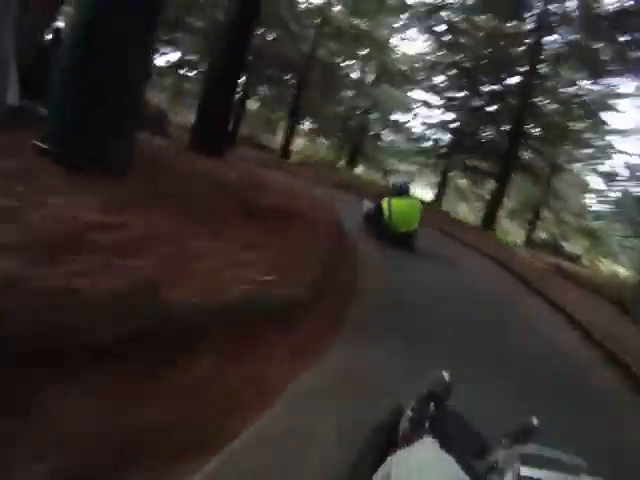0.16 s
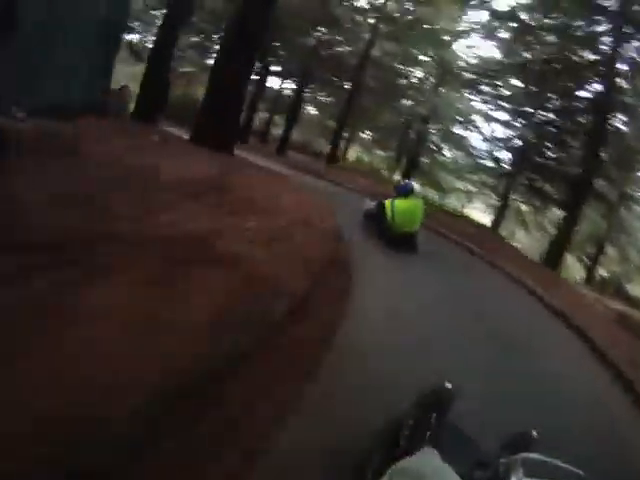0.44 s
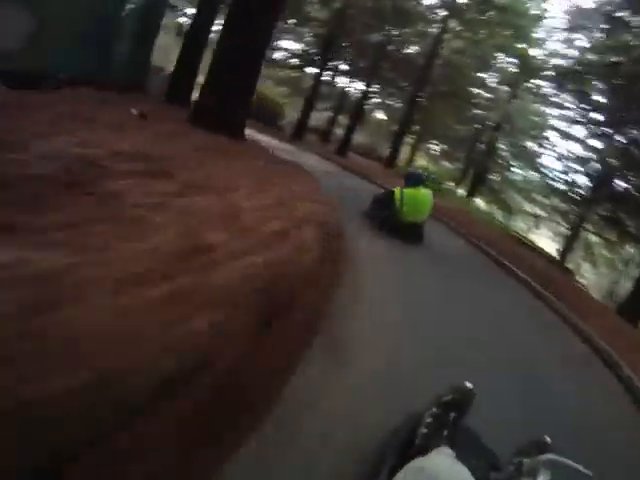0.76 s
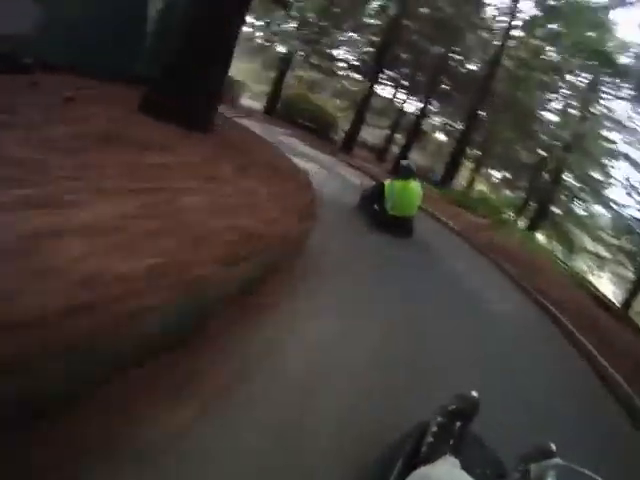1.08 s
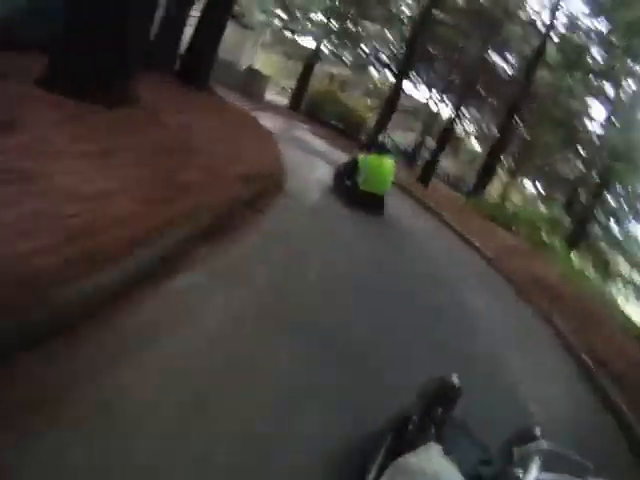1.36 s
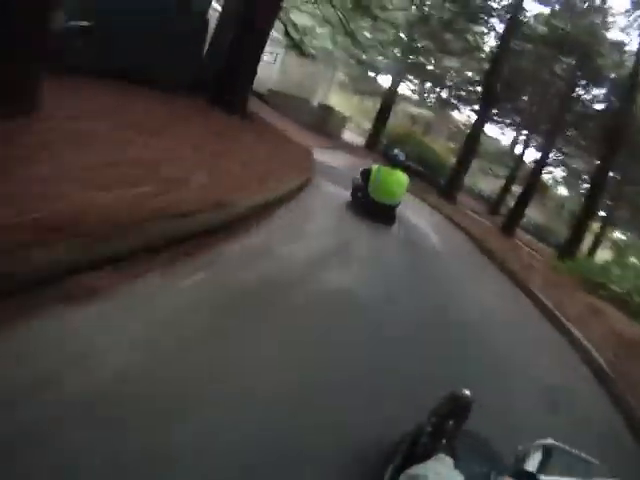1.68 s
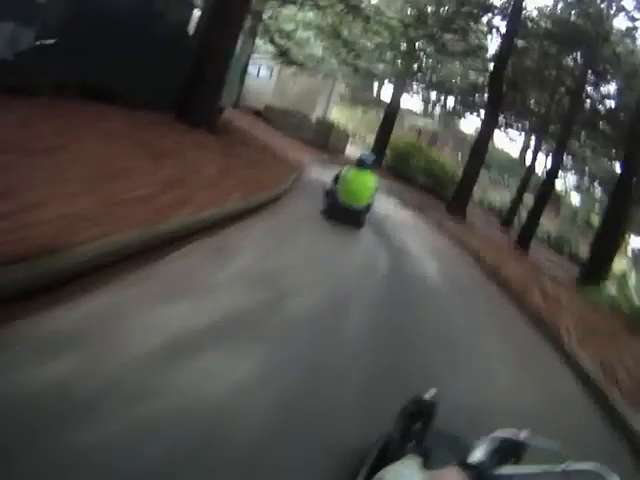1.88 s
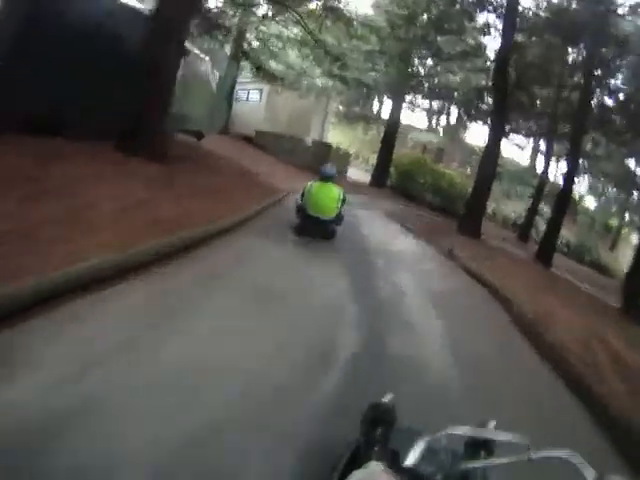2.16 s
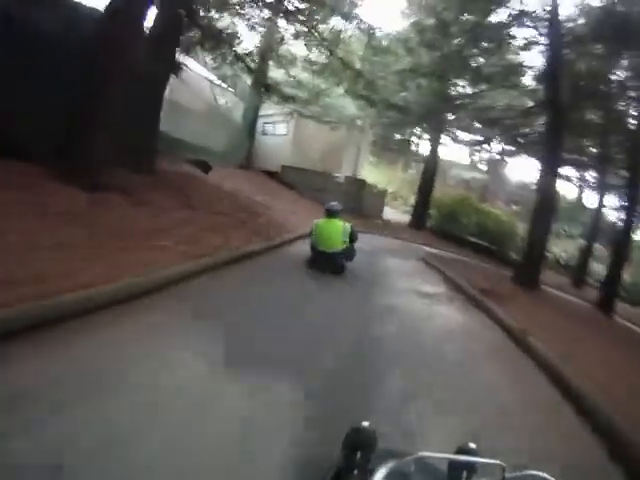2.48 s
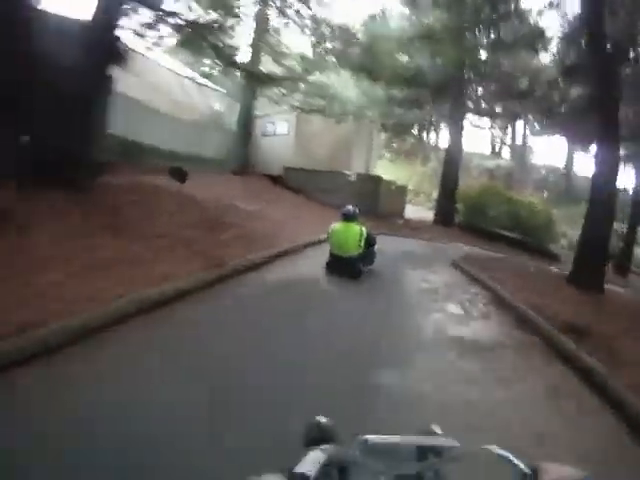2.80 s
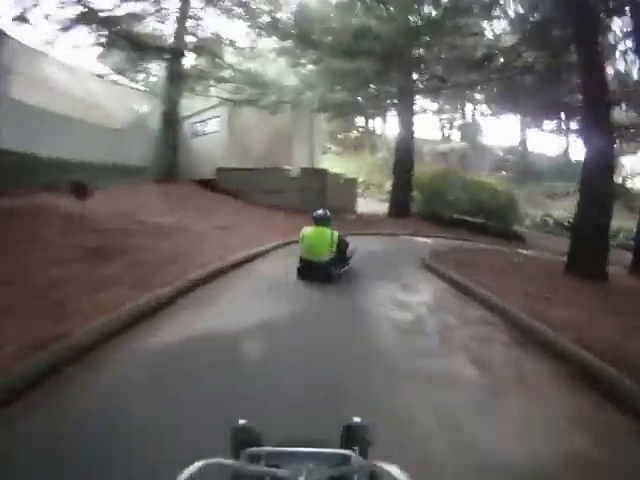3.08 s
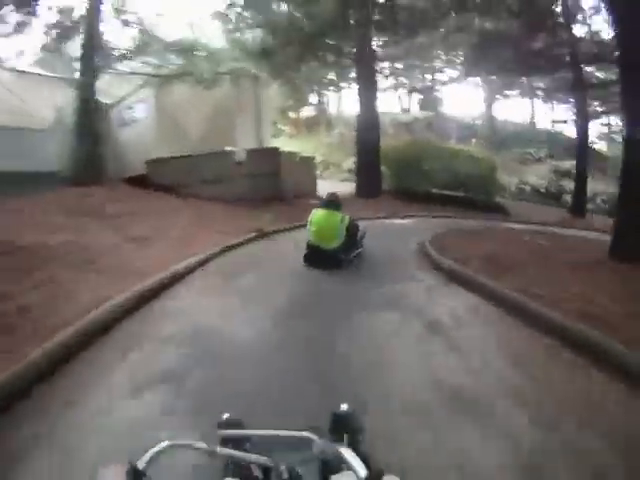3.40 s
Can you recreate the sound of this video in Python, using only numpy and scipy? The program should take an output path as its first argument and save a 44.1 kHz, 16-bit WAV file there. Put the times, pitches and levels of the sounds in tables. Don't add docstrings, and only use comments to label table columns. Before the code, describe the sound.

Hard wheels rumble over pavement outdoors, heard close from a cased camera on the rider. Irregular bumps knock the cart's body and fittings, calmer in the middle, then stronger near the end, with low wind flutter.

```python
import sys
import numpy as np
from scipy import signal
from scipy.fft import rfft, irfft
from scipy.io import wavfile
from scipy.ndimage import uniform_filter1d

SR = 44100
rng = np.random.default_rng(int(sys.argv[2]) if len(sys.argv) > 2 else 0)


def volts_from_decibels(level):
    exponent = np.asarray(level, float) / 20
    return 10 ** exponent


def waveform_to_disk(signal):
    frames = np.transpose(np.atleast_2d(signal))
    scaled = np.clip(frames, -1, 1) * 32767
    samples = np.round(scaled).astype(np.int16)
    wavfile.write(sys.argv[1], SR, samples)


N = 156114
TIME = np.arange(N) / SR

# (time [s], roughness level [dB], load on the body [dB])
ROAD = [(0, -54.5, -2), (.3, -53, -2), (.46, -54, -4), (.55, -55.5, -3.5), (.75, -56, -0.5), (.94, -57, -9),
        (1.15, -55, -4.5), (1.45, -54, -6), (1.62, -56, -5.5), (1.76, -52.5, -4.5), (1.96, -51.5, -6),
        (2.08, -53.5, -3.5), (2.3, -53.5, -6.5), (2.62, -52.5, -3.5), (3.0, -51.5, -7), (3.2, -51, -3.5),
        (3.38, -49, -9), (3.54, -53, 0.5)]
# (time [s], rattle level [dB], rattle decay t60 [s])
JOLTS = [(0.162, -38.5, 0.17), (0.2194, -46, 0.052), (0.2498, -42, 0.12), (0.3105, -38, 0.11),
         (0.3425, -41, 0.29), (0.397, -38.5, 0.096), (0.4594, -41, 0.1), (0.5847, -38, 0.51),
         (0.6394, -50, 0.24), (0.7277, -43, 0.39), (0.818, -40, 0.22), (0.982, -43.5, 1),
         (1.071, -35.5, 0.12), (1.269, -42.5, 0.2), (1.689, -38, 0.23), (1.8297, -34.5, 0.15),
         (1.8706, -42, 0.19), (1.9114, -39.5, 0.31), (2.1624, -35, 0.087), (2.1947, -33.5, 0.17),
         (2.255, -37.5, 0.65), (2.439, -36.5, 0.27), (2.7635, -37, 0.31), (2.8194, -38, 0.37),
         (2.877, -26.5, 0.14), (3.002, -37.5, 0.36), (3.0774, -38, 0.12), (3.33, -30.5, 0.085),
         (3.4026, -33.5, 0.14), (3.428, -31, 0.095)]
# (frequency [Hz], level [dB])
RUSH = [(100, -10.5), (300, -0.5), (500, -4), (900, -12.5), (2000, -12), (4500, -24), (9000, -25.5),
        (15500, -29.5)]
# (frequency [Hz], width [Hz], gain [dB])
CASE = [(1239, 325, 11.5), (1460, 820, -3), (1900, 49, 5), (2370, 360, 1), (3126, 150, -9),
        (3570, 166, 6.5), (4890, 720, 2), (6030, 870, -9.5), (5920, 640, -2.5), (7730, 430, -5),
        (8900, 1500, -2), (10530, 290, 2.5), (818, 120, 5), (13600, 640, 1)]
# (frequency [Hz], width [Hz], level [dB])
BODY_MODES = [(143.5, 19.4, 0), (172, 18.3, 0), (215.4, 24.2, -1), (310, 48, -13.5), (410, 50, -19.5),
              (507, 40, -17)]
# (time [s], level [dB])
WIND = [(0.0, -31), (0.05, -36), (0.29, -36), (0.37, -36.5), (0.52, -34.5), (0.86, -39.5), (0.95, -42.5),
        (1.79, -36), (1.87, -27), (1.95, -34.5), (2.2, -35), (2.7, -37), (2.9, -35), (3.12, -36),
        (3.44, -37), (3.54, -38)]
# (frequency [Hz], level [dB per Hz])
BUFFET = [(12, 6.5), (22, -3.5), (35, -2.5), (65, -4.5), (100, -13.5), (200, -29), (500, -67)]
# (time [s], length [s], frequency [Hz], peak level [dB])
WOBBLES = [(0.05, 0.048, 28, -21), (.1, 0.065, 21, -26.5), (0.332, 0.13, 20, -30.5),
           (0.627, 0.087, 20.4, -31.5), (0.8, 0.074, 26, -30.5), (.9, 0.059, 18, -33),
           (1.05, 0.056, 18.5, -31.5), (1.577, 0.072, 24, -32.5), (1.75, 0.075, 16, -40),
           (1.868, 0.062, 28, -28.5), (1.945, 0.061, 11, -32), (1.521, 0.048, 17, -31),
           (3.194, 0.048, 25, -32), (2.247, 0.253, 20.2, -29.5), (2.392, 0.34, 21.6, -28.5),
           (2.758, 0.11, 23, -30.5), (3.02, 0.078, 11, -34), (3.355, 0.14, 18.4, -41)]
WOBBLE_HARMONICS = [-8, -19]
# (time [s], peak level [dB], frequency [Hz], decay t60 [s])
KNOCKS = [(.005, -33.5, 310, 0.091), (2.46, -34.5, 303, 0.16), (.46, -40.5, 493, 0.13),
          (.62, -39, 457, 0.17), (2.31, -38, 478, 0.074), (1.267, -34, 1340, 0.021),
          (1.27, -44, 2010, 0.07), (1.695, -40, 1900, 0.049), (1.87, -38.5, 2240, 0.031),
          (1.912, -38, 1313, 0.13), (2.194, -37.5, 2270, 0.035), (2.53, -34.5, 396, 0.17),
          (2.6, -38.5, 410, 0.44), (2.785, -32.5, 298, 0.12), (2.802, -35, 1880, 0.025),
          (2.873, -28.5, 570, 0.039), (2.878, -27, 1245, 0.033), (2.878, -35, 2440, 0.032),
          (3.33, -43, 1230, 0.11), (3.401, -37.5, 3600, 0.038)]
# (time [s], peak level [dB], frequency [Hz])
THUDS = [(0.054, -31, 141.3), (0.134, -39, 180), (.31, -34, 147), (0.436, -33, 209), (0.481, -42, 157),
         (0.584, -27.5, 153), (0.732, -36, 219), (1.031, -34, 163), (1.085, -34.5, 187), (1.161, -36, 151),
         (1.571, -42, 141), (1.689, -34, 162), (1.806, -32.5, 172), (1.911, -32, 172), (2.17, -39.5, 157),
         (2.248, -35, 212), (2.36, -43, 166), (2.439, -31, 172.4), (2.504, -40, 145), (2.542, -33, 164),
         (2.676, -41, 161), (2.817, -27.5, 160), (2.87, -27.5, 171), (2.995, -32.5, 150), (3.09, -27, 160),
         (3.183, -30.5, 172), (3.216, -36.5, 201), (3.296, -28, 205), (3.392, -36, 178),
         (3.472, -30.5, 154)]
# (time [s], peak level [dB], frequency [Hz])
TICKS = [(.0727, -39, 3530), (.0735, -46, 8500), (.2194, -33, 1910), (.599, -43, 2000), (.817, -40, 1810),
         (1.829, -37, 2170), (1.831, -32, 890), (1.835, -48, 4760), (1.886, -39, 1900), (1.9355, -33, 1970),
         (2.0198, -38, 1800), (2.1595, -48, 2300), (2.2548, -40, 2210), (2.576, -40, 1850),
         (2.822, -46, 5200), (2.826, -32, 1220), (2.838, -38, 2420), (2.876, -47, 3770), (2.879, -47, 5400),
         (2.874, -45, 770), (2.901, -39, 1250), (3.0754, -48, 2200), (3.402, -38, 4860), (3.402, -43, 7100),
         (3.41, -43, 8500), (1.269, -40, 1500), (1.91, -36, 1310), (3.425, -44, 4400)]
# (time [s], peak level [dB], frequency [Hz])
PAN_KNOCKS = [(0.135, -34, 345), (0.72, -51, 394), (0.885, -40, 312), (0.939, -36, 520), (1.276, -38, 498),
              (1.504, -42, 300), (1.692, -30, 314), (1.806, -31, 277), (1.829, -32, 295), (1.913, -31, 518),
              (2.075, -29, 408), (2.261, -38, 282), (2.309, -27.5, 280), (2.402, -29, 347),
              (2.874, -34, 360), (2.939, -29, 303), (3.064, -27, 261), (3.116, -30, 320), (3.291, -26, 316),
              (3.347, -34, 401), (3.428, -28, 377)]
# (time [s], length [s])
SPARSE = [
    (.13, .07),
    (.26, .2),
    (.68, .26),
    (1.13, .52),
    (2.05, .13),
    (2.52, .2),
    (2.89, .12),
    (3.46, .07),
]

GRIT_PER_S, GRIT_SPREAD_DB, GRIT_SHARE = 1500, 3.9, 0.64
TREMORS_PER_S, TREMOR_SPREAD_DB, TREMOR_DB, TREMOR_T60_S = 40, 3, -13, 0.03
RATTLE_DB, RATTLE_RISE_S = -9.5, 0.006
FINE_PATCH_DB, BROAD_PATCH_DB, CASE_RIPPLE_DB = 0.5, 1.6, 1.4
DARKENS_HZ, DARKENS_WIDTH_HZ, DARKENS_SHARE_PER_S = 620, 100, 0.18
DRONE_DB, DRONE_FOLLOWS_ROAD, UPPER_MODES_DB_PER_S = 17.5, 0.77, -0.5
GUST_DB = 5.5
MOUNT_HZ, MOUNT_WIDTH_HZ, MOUNT_DB = 27.5, 12, -41.5
WOBBLE_RISE_S, WOBBLE_FALL_S, WOBBLE_SWELL_DB = 0.011, 0.048, 3
KNOCK_RISE_S, TICK_T60_S = 0.00097, 0.016
THUD_DB, THUD_T60_S, THUD_RISE_S, THUD_LEAD_S = 6, 0.14, 0.0077, 0.004
PAN_DB, PAN_T60_S, PAN_RISE_S = -6, 0.078, 0.0027
FAINT_DB, FAINT_LEFT_DB, FAINT_WANDER_DB, SPARSE_DB = -12, -30, 2.4, 4
EDGE_HZ = 15000


def evened(x):
    return x / np.sqrt(np.mean(x ** 2) + 1e-20)


def read(points, hz):
    f, value = np.transpose(points)
    return np.interp(np.log(hz + 1), np.log(f + 1), value)


def curve(table, column):
    table = np.array(table)
    return np.interp(TIME, table[:, 0], table[:, column])


def add(mix, s, sound):
    part = mix[round(s * SR):][:len(sound)]
    part += sound[:len(part)]


def colour(x, gain_db):
    log_gain = np.r_[gain_db, gain_db[-2:0:-1]] * np.log(10) / 20
    spectrum = np.exp(np.conj(signal.hilbert(log_gain)))
    taps = np.fft.ifft(spectrum).real[:4096]
    return signal.oaconvolve(x, taps / np.linalg.norm(taps))[:N]


def resonate(x, hz, width):
    turn = np.exp(2j * np.pi * hz * TIME)
    r = np.exp(-np.pi * width / SR)
    return 2 * (turn * signal.lfilter([1 - r], [1, -r], x / turn)).real


def blurred(x, frames, bins):
    return uniform_filter1d(uniform_filter1d(x, frames, axis=-1), bins, axis=-2)


def patchy(x, patch_db, frames, bins):
    z = signal.stft(x, nperseg=512)[2]
    patches = evened(blurred(rng.standard_normal(z.shape), frames, bins))
    return signal.istft(z * volts_from_decibels(patch_db * patches), nperseg=512)[1][:N]


def clicks(per_s, spread_db):
    size_db = spread_db * np.minimum(rng.exponential(1, N), 4)
    return volts_from_decibels(size_db) * (rng.random(N) < per_s / SR)


def struck(rows, rise_s):
    out, t = np.zeros(N), np.arange(0, 0.3, 1 / SR)
    for (s, db, hz, t60), (phase, bend) in zip(rows, rng.random((len(rows), 2))):
        turn = 2 * np.pi * (hz * t * (1 + 1.16 * (bend - 0.5) * t) + phase)
        envelope = np.minimum(t / rise_s, 1) * volts_from_decibels(db - 60 * t / t60)
        add(out, s, envelope * np.sin(turn))
    return out


def shaking():
    fade = volts_from_decibels(-60 / TREMOR_T60_S / SR) ** 2
    tremor = signal.lfilter([1], [1, -fade], clicks(TREMORS_PER_S, TREMOR_SPREAD_DB) ** 2)
    tremor = volts_from_decibels(2 * TREMOR_DB) * uniform_filter1d(tremor, size=90)
    power = volts_from_decibels(2 * curve(ROAD, 1)) * (1 + tremor)
    t = np.arange(0, 0.5, 1 / SR)
    for s, db, t60 in JOLTS:
        rise = np.minimum(t / RATTLE_RISE_S, 1) ** 2
        add(power, s - RATTLE_RISE_S, rise * volts_from_decibels(2 * (db + RATTLE_DB - 60 * t / t60)))
    return np.sqrt(abs(power))


def wheels():
    grit = evened(clicks(GRIT_PER_S, GRIT_SPREAD_DB) * rng.choice([-1., 1.], N))
    hiss = GRIT_SHARE * grit + np.sqrt(1 - GRIT_SHARE ** 2) * rng.standard_normal(N)
    hiss = patchy(hiss, FINE_PATCH_DB, 8, 4)
    hiss = patchy(hiss, BROAD_PATCH_DB, 24, 20)
    drive = shaking() * hiss
    hz = np.fft.rfftfreq(8192, 1 / SR)
    case_db = sum(db * np.exp(-(2 * (hz - f) / w) ** 2) for f, w, db in CASE)
    ripple = evened(uniform_filter1d(rng.standard_normal(len(hz)), size=16))
    case_db = case_db + CASE_RIPPLE_DB * ripple * (hz > 1500)
    rush = volts_from_decibels(6.5) * colour(drive, read(RUSH, hz) + case_db)
    thinning = DARKENS_SHARE_PER_S * (TIME - TIME.mean())
    return rush - thinning * resonate(rush, DARKENS_HZ, DARKENS_WIDTH_HZ)


def body_drone():
    road_db = curve(ROAD, 1)
    swing_db = DRONE_FOLLOWS_ROAD * (road_db - road_db.mean())
    level_db = road_db.mean() + swing_db + curve(ROAD, 2) + DRONE_DB
    noise, ring = rng.standard_normal(N), np.zeros(N)
    for k, (hz, width, db) in enumerate(BODY_MODES):
        drift_db = (k > 2) * UPPER_MODES_DB_PER_S * (TIME - TIME.mean())
        mode = resonate(resonate(noise, hz, width), hz, 1.73 * width)
        ring += (-1) ** k * volts_from_decibels(db + drift_db) * mode
    return volts_from_decibels(level_db) * evened(ring)


def wind():
    hz = np.fft.rfftfreq(N, 1 / SR)
    spectrum = rfft(rng.standard_normal(N)) * volts_from_decibels(read(BUFFET, hz)) * (hz > 8)
    buffeting = evened(irfft(spectrum, N))
    gusts = uniform_filter1d(rng.standard_normal(N), size=1500)
    gusts = evened(uniform_filter1d(gusts, size=1500))
    return volts_from_decibels(curve(WIND, 1) + GUST_DB * np.tanh(gusts) - 3) * buffeting


def mount():
    sway = resonate(rng.standard_normal(N), MOUNT_HZ, MOUNT_WIDTH_HZ)
    out = volts_from_decibels(MOUNT_DB) * evened(resonate(sway, MOUNT_HZ, 2 * MOUNT_WIDTH_HZ))
    for s, length, hz, db in WOBBLES:
        t = np.arange(0, length, 1 / SR)
        turn = 2 * np.pi * hz * (t - WOBBLE_RISE_S)
        swing = np.cos(turn)
        for k, harmonic_db in enumerate(WOBBLE_HARMONICS):
            swing += volts_from_decibels(harmonic_db) * np.cos((k + 2) * turn)
        ends = np.clip(np.minimum(t / WOBBLE_RISE_S, (length - t) / WOBBLE_FALL_S), 0, 1)
        level = volts_from_decibels(db + WOBBLE_SWELL_DB * np.sin(np.pi * t / length))
        add(out, s, -swing * np.sin(ends * np.pi / 2) ** 2 * level)
    return out


def fittings():
    return struck(KNOCKS, KNOCK_RISE_S)


def thuds():
    rows = [(max(s - THUD_LEAD_S, 0), db + THUD_DB, hz, THUD_T60_S) for s, db, hz in THUDS]
    return struck(rows, THUD_RISE_S)


def ticks():
    return struck([(s, db, hz, TICK_T60_S) for s, db, hz in TICKS], KNOCK_RISE_S)


def floor_pan():
    return struck([(s, db + PAN_DB, hz, PAN_T60_S) for s, db, hz in PAN_KNOCKS], PAN_RISE_S)


def scene():
    rolling = wheels() + body_drone() + wind() + mount()
    impacts = fittings() + thuds() + ticks() + floor_pan()
    return (rolling + impacts)[None]


def thinned(x):
    hz, t, z = signal.stft(x, SR, nperseg=1024)
    power = blurred(abs(z) ** 2, 5, 3)
    usual = np.median(power, axis=2)[..., None]
    around = blurred(np.minimum(power, 2 * usual), 60, 60)
    chance = evened(blurred(rng.standard_normal(z.shape), 16, 8))
    sparse = sum((t > s) & (t < s + length) for s, length in SPARSE)
    sparse = sparse * (abs(hz - 6000) < 550)[:, None]
    threshold_db = FAINT_DB + SPARSE_DB * sparse + FAINT_WANDER_DB * chance
    weak = (power < volts_from_decibels(2 * threshold_db) * around) & (hz > 2500)[:, None]
    return signal.istft(z * np.where(weak, volts_from_decibels(FAINT_LEFT_DB), 1), SR, nperseg=1024)[1][:, :N]


def top_cut(x):
    return signal.sosfilt(signal.butter(12, 15520, fs=SR, output="sos"), x)


def record(dry):
    overloaded = np.tanh(1.54 * dry) / 1.454
    low_pass = signal.firwin(45, EDGE_HZ, fs=SR)[None]
    limited = signal.oaconvolve(overloaded, low_pass, "same")
    return top_cut(thinned(limited))


dry = scene()
out = record(dry)
waveform_to_disk(out)
```